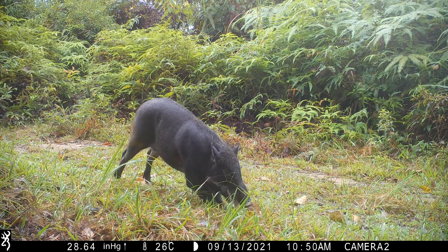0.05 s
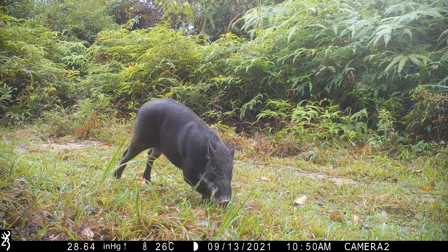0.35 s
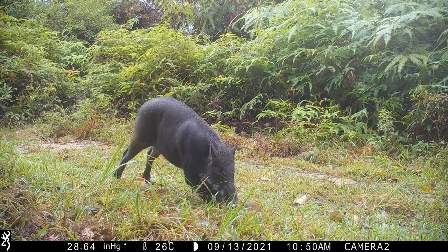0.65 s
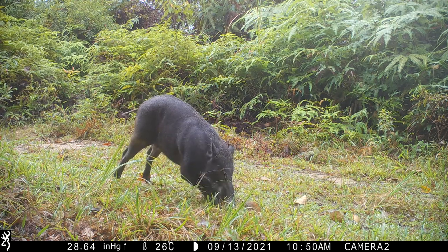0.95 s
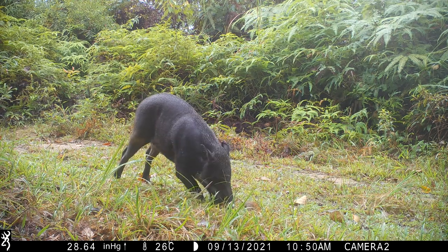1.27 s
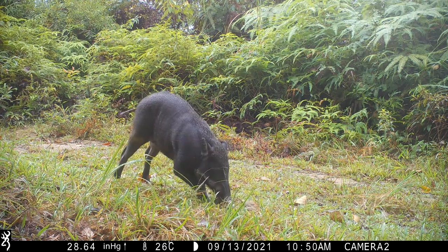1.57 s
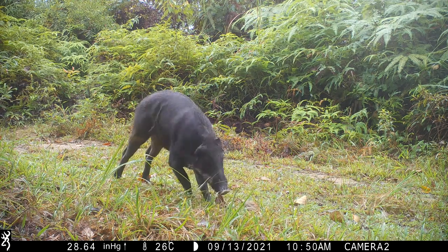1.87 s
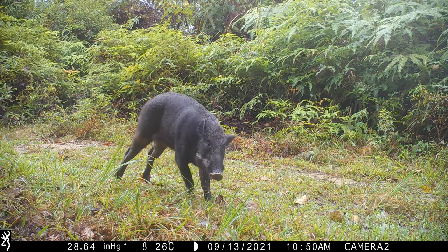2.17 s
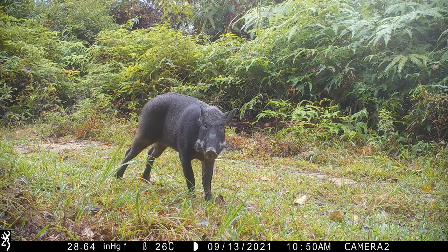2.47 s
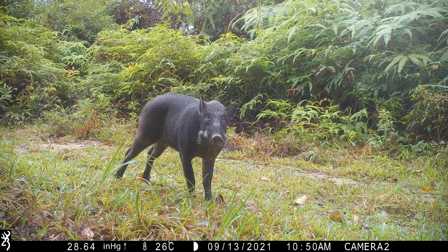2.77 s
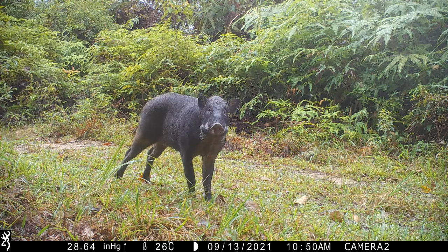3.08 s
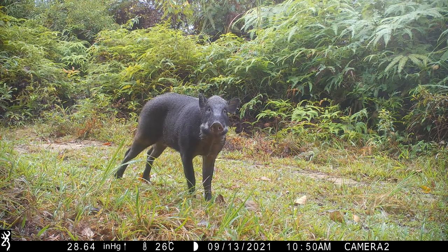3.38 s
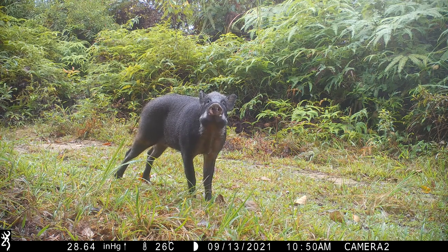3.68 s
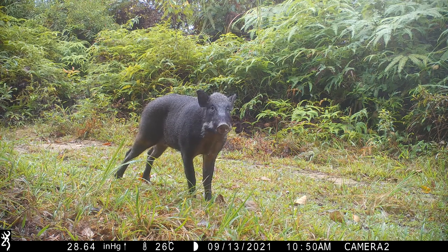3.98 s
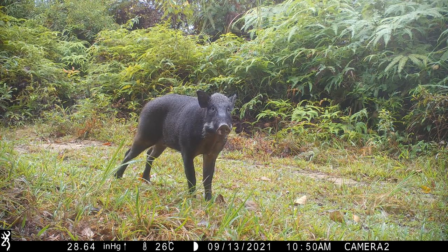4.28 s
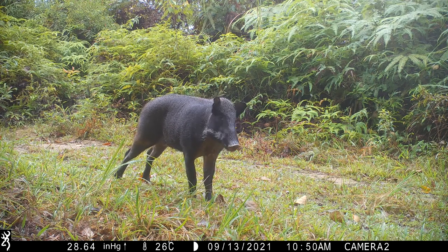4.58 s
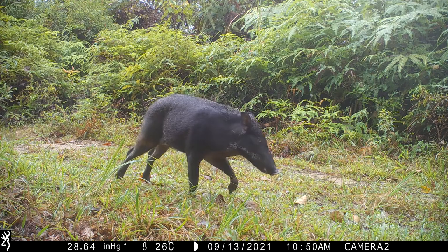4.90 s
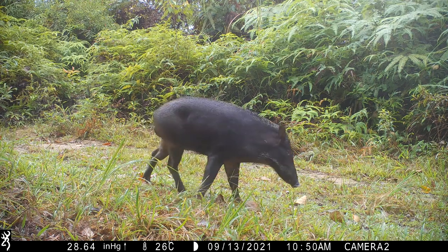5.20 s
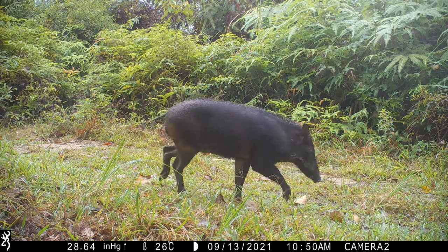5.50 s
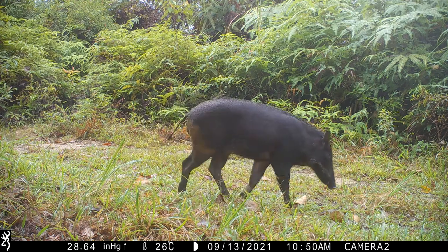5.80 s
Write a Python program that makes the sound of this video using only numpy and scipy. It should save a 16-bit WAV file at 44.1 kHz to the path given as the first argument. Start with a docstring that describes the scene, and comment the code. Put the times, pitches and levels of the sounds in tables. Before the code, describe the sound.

A wild boar roots through grass at a forest edge, with soft rustles and crisp snaps of stems. About two seconds in comes a quick run of loud, wet jaw smacks. A few more smacks and snaps follow, then a pause, then faint hoof steps brushing the grass. Small birds chirp and whistle throughout over a steady hush, with very faint insects and a thin electronic whine at the microphone.

```python
"""A wild boar roots in grass at a forest edge, smacks its jaws, chews, stands still and walks off.
Each wet smack rings its mouth, while its snout and hooves brush the grass and snap stems.
Small birds call from the thicket, whose echo smears their notes, over a steady forest hush
with faint insects. A trail camera's electronics add a thin whine."""
import sys
import numpy as np
from scipy import signal
from scipy.fft import rfft, irfft, next_fast_len
from scipy.io import wavfile
from scipy.ndimage import map_coordinates

SR = 44100
rng = np.random.default_rng(int(sys.argv[2]) if len(sys.argv) > 2 else 0)


def unload_wav(signal):
    """Save mono or channel-first audio to the path in sys.argv[1] as 16-bit WAV at rate SR, clipped to [-1, 1]."""
    wavfile.write(
        sys.argv[1],
        SR,
        np.round(np.clip(np.atleast_2d(signal).T, -1, 1) * 32767).astype(np.int16),
    )


N = 257984  # samples, about 5.85 seconds

# the boar's wet jaw smacks: (time [s], level [dB], mouth pitch [Hz], swell time [s],
# second pop compared with the smack [dB])
JAW_SMACKS = [(1.033, -42.5, 883, 0.0033, -5), (1.352, -33, 1154, 0.0026, -17),
              (1.473, -39, 1404, .0024, -10), (1.717, -42, 1430, 0.0023, -14),
              (1.7902, -16.5, 1690, 0.00054, -20), (1.8401, -29.5, 1440, 0.00073, -11),
              (1.9011, -18.5, 1380, 0.00097, -5), (1.9592, -20, 1540, 0.00072, -10),
              (2.0164, -15, 1390, 0.0011, -10), (2.086, -27, 1244, 0.0018, -13),
              (2.138, -32.5, 1390, 0.00088, -24), (2.378, -40, 1180, 0.0023, -5),
              (3.0257, -40.5, 1390, 0.00087, -12), (3.127, -35, 1270, .0012, -7)]
def jaws():
    """Each smack comes with tiny saliva clicks and a smaller, higher pop as the lips part again."""
    out = np.zeros(N)
    for s, db, hz, swell, second_db in JAW_SMACKS:
        add(out, s, amp(db) * smack(hz, swell))
        add(out, s + .0091, amp(db + second_db) * smack(hz * 1.045, swell * .73))
        for when, pitch in rng.standard_normal((3, 2)):  # three saliva clicks
            click = smack(hz * np.exp(.28 * pitch), swell=.00048)
            add(out, s + .005 + .0048 * when, amp(db - 20) * click)
    return out


# the tone of a dull cheek thump: (frequency [Hz], level [dB])
CHEEK_TONE = [(30, -41), (120, -13), (280, -2), (480, -11), (1000, -16), (3000, -94)]
# the tone of a sharp crack, for spit here and for stems below: (frequency [Hz], level [dB])
CRACK_TONE = [(50, -15), (250, -4), (700, 0.5), (1600, 9.5), (3600, 2), (5000, -14), (8000, -43),
              (15000, -39)]
def smack(hz, swell):
    """The mouth rings briefly, its pitch falling as it opens, while spit crackles and cheeks thump."""
    t = clock(.1)
    age = t / swell
    pitch = hz * (1 + 1.35 * np.exp(-age / .53))
    loudness = age ** 2 * np.exp(2 * (1 - age))  # peaks at the swell time
    pop = loudness * sine(pitch)
    spit = amp(-12) * burst(t, CRACK_TONE, fade_s=.008)
    thump = amp(-37.5) * burst(t, CHEEK_TONE, fade_s=.14)
    return echo(pop + spit + thump, fade_s=.11, echo_db=-17, build_s=.003)


# the loudest stems breaking: (time [s], level [dB], pitch [Hz], splinter compared with the snap [dB])
STEM_SNAPS = [(.357, -39, 2000, -10), (0.3716, -34.5, 1940, 0.5), (.5435, -42, 2240, -11),
              (0.611, -46, 2260, -11), (.647, -38.5, 3030, -9), (.7878, -36, 2520, -9),
              (.913, -38.5, 1140, -15), (1.025, -36.5, 1150, -20), (1.1736, -39, 2950, -13),
              (1.301, -33.5, 1720, -12), (1.601, -38.5, 2830, -3), (1.852, -35.5, 2780, -2.5),
              (2.7617, -35.5, 1400, -13), (2.951, -35, 2600, -11), (3.1025, -38, 3020, -18),
              (3.1279, -34.5, 2870, -14), (3.293, -39.5, 2340, -20), (3.689, -39, 2980, -17),
              (5.26, -40, 1580, -8), (5.595, -39, 1950, -16)]
def stems(small_per_s=14, small_hz=1820):
    """A few stout stems snap loudly; small ones break at random, louder when the boar pushes harder."""
    out, push = np.zeros(N), grass_push()
    for s, db, hz, splinter_db in STEM_SNAPS:
        add(out, s, amp(db) * snap(hz, splinter_db))
    for when, size, pitch in rng.random((int(small_per_s * N / SR), 3)):
        at = int(when * N)
        loudness = push[at] * amp(14) * (.5 + size)
        add(out, at / SR, loudness * snap(small_hz * 2 ** (pitch - .5), splinter_db=-4))
    return out


def snap(hz, splinter_db):
    """A stem gives way with a crack, a bright splinter and a brief hollow ring."""
    t = clock(.05)
    onset = 1 - np.exp(-t / .0003)
    ring = np.sin(2 * np.pi * hz * t) * fade(t, .008) * onset
    crack = amp(-7) * burst(t, CRACK_TONE, fade_s=.014)
    splinter = amp(splinter_db) * burst(t, GRASS_TONE, fade_s=.004)
    return echo(ring + crack + splinter, fade_s=.041, echo_db=-3, build_s=.0013)


# the tone of rustling blades and splintering stems: (frequency [Hz], level [dB])
GRASS_TONE = [(150, -27.5), (600, -6.5), (1500, 3), (3000, 0.5), (4200, -9.5), (6000, -17.5), (9000, -32.5),
              (15000, -34)]
def grass(ticks_per_s=3000):
    """Blades tick and scrape under each stroke, blending into an uneven rustle."""
    strength = amp(3.8 * np.minimum(rng.exponential(size=N), 4))
    ticks = (rng.random(N) < ticks_per_s / SR) * rng.standard_normal(N) * strength
    return grass_push() * unit(coloured(ticks, GRASS_TONE)) * amp(2.4 * wobble(60))


# snout and hoof strokes through the grass: (middle time [s], half length [s], level [dB])
GRASS_STROKES = [(0.034, 0.028, -56.5), (0.252, 0.031, -52), (0.34, 0.042, -56.5), (0.607, 0.081, -55),
                 (0.924, 0.06, -54.5), (1.073, 0.024, -55), (1.272, 0.054, -53), (1.517, 0.057, -58.5),
                 (1.618, 0.037, -51.5), (1.915, 0.17, -57), (2.795, 0.034, -58), (4.85, 0.016, -59.5),
                 (4.97, 0.036, -58.5), (5.28, 0.1, -63), (5.65, 0.064, -62.5)]
def grass_push():
    """How hard the boar pushes the grass: every stroke swells and fades."""
    t = np.arange(N) / SR
    power = sum(amp(db) ** 2 * np.exp(-((t - s) / half) ** 2) for s, half, db in GRASS_STROKES)
    return np.sqrt(power)


# one bird's repeated rising call: (time [s], opening pitch [Hz], level [dB])
RISING_CALLS = [(0.286, 3154, -59.5), (0.597, 3160, -59.5), (.84, 3080, -62.5), (1.089, 3130, -62.5),
                (1.321, 2937, -61), (1.549, 3060, -64.5), (1.78, 3165, -59.5), (2.099, 3163, -59.5),
                (2.353, 3060, -61.5), (2.591, 3025, -63), (3.073, 3150, -60), (3.375, 3070, -59.5),
                (3.644, 3115, -63), (3.882, 3034, -61.5), (4.39, 3113, -62), (4.682, 3103, -60),
                (4.933, 3033, -62), (5.162, 2963, -62), (5.412, 2964, -61.5)]
def calling_bird(length_s=.105, opening_share=.36, flick_drop_db=5):
    """A clean note sags a little, then flicks up, softer and raspier, and lingers in the thicket."""
    out, t = np.zeros(N), clock(length_s)
    progress = t / t[-1]
    rise = np.clip((progress - opening_share) / (1 - opening_share), 0, 1)
    sag = 1 + .02 * np.exp(-progress / .12)
    rasp = .006 + .055 * np.sqrt(rise)
    for s, hz, db in RISING_CALLS:
        flick_hz = 856.6 + 72 * (db + 62)  # a louder call flicks higher
        loudness = amp(db - flick_drop_db * np.sqrt(rise))
        call = loudness * note(hz * sag + flick_hz * rise, rasp, edge=.08)
        add(out, s, echo(call, fade_s=.56, echo_db=1, build_s=.013))
    return out


# clear bird whistles: (time [s], length [s], start pitch [Hz], held pitch [Hz], level [dB])
BIRD_WHISTLES = [(.113, 0.076, 4600, 4290, -67.5), (.522, 0.097, 2750, 2275, -52.5),
                 (.865, .1, 4150, 4460, -64), (.965, 0.082, 4400, 4510, -61.5),
                 (1.653, 0.043, 4320, 4250, -66), (2.774, 0.12, 4330, 4710, -65),
                 (4.185, 0.051, 4250, 4150, -66.5), (5.676, .1, 3950, 4290, -62.5),
                 (5.735, 0.086, 4320, 4670, -59.5), (5.77, 0.061, 2420, 2330, -62.5)]
def whistling_birds(settle_s=.01337):
    """Each whistle slides onto a pitch and holds it."""
    out = np.zeros(N)
    for s, length, start, held, db in BIRD_WHISTLES:
        pitch = held + (start - held) * np.exp(-clock(length) / settle_s)
        add(out, s, amp(db) * thicket(note(pitch, rasp=.016, edge=.19)))
    return out


# raspy sliding notes: (time [s], length [s], start pitch [Hz], end pitch [Hz], level [dB])
BIRD_SLIDES = [(.499, .053, 3080, 2680, -57), (0.623, .13, 2600, 3424, -56),
               (1.048, 0.026, 4010, 4300, -58), (2.842, 0.018, 4770, 5180, -65),
               (2.849, 0.076, 2900, 4090, -56), (5.69, 0.15, 4900, 5500, -75)]
def sliding_birds():
    """Each note bends from one pitch to another, fast at first, then levelling off."""
    out = np.zeros(N)
    for s, length, start, end, db in BIRD_SLIDES:
        pitch = end + (start - end) * (1 - clock(length) / length) ** 1.8
        add(out, s, amp(db) * thicket(note(pitch, rasp=.0466, edge=.24)))
    return out


# a quick run of short chirps: (time [s], level [dB])
BIRD_CHIRPS = [(4.072, -70), (4.137, -63.5), (4.224, -62.5), (4.312, -62), (4.419, -65)]
def chirping_bird(length_s=.038, start_hz=3750, end_hz=5150):
    """Each chirp sweeps straight up. This bird sits nearer, so it has less echo."""
    out = np.zeros(N)
    pitch = start_hz + (end_hz - start_hz) * clock(length_s) / length_s
    for s, db in BIRD_CHIRPS:
        add(out, s, amp(db) * thicket(note(pitch, rasp=.075, edge=.21), echo_db=-2))
    return out


def note(pitch, rasp, edge):
    """A bird's tone, made raspy by fast pitch flutter; edge is the share that fades at each end."""
    progress = np.linspace(0, 1, len(pitch))
    ramp = np.clip(np.minimum(progress, 1 - progress) / edge, 0, 1)
    loudness = np.sin(np.pi / 2 * ramp) ** 2
    flutter = 1 + rasp * wobble(700, len(pitch))
    return np.sqrt(2) * loudness * sine(pitch * flutter)


def thicket(song, echo_db=.5):
    """A song lingers among the trees."""
    return echo(song, fade_s=.49, echo_db=echo_db, build_s=.0088)


def echo(sound, fade_s, echo_db, build_s):
    """Leaves and ground scatter a sound into a soft tail, different every time."""
    t = clock(.6)
    tail = rng.standard_normal(len(t)) * fade(t, fade_s) * (1 - np.exp(-t / build_s))
    path = amp(echo_db) * tail / np.linalg.norm(tail)
    path[0] = 1  # the direct sound arrives first
    return signal.fftconvolve(sound, path)


# the tone of the forest's hush: (frequency [Hz], level [dB])
HUSH_TONE = [(15, -46), (30, -15.5), (70, -10.5), (220, -2.5), (550, 1), (1250, 1), (2300, -1.5),
             (3200, -7), (3900, -12.5), (4600, -21), (6000, -28.5), (8500, -39), (11000, -39.5),
             (15500, -39)]
def forest(insect_hz=6620):
    """A steady hush, with the faint high buzz of far insects."""
    hush = amp(-56.5) * coloured(rng.standard_normal(N), HUSH_TONE)
    insects = unit(wobble(300) * np.sin(2 * np.pi * insect_hz * np.arange(N) / SR))
    return hush + amp(-90.5) * insects


# moments when the whine's pitch flickers upward: (middle time [s], half length [s])
WHINE_FLICKERS = [(2.523, .006), (4.004, 0.0083)]
def camera_whine(hz=7796.2, flips_per_s=59.5):
    """The camera's electronics sing one thin tone whose wave keeps flipping upside down."""
    t = np.arange(N) / SR
    flicker = sum(abs(t - s) < half for s, half in WHINE_FLICKERS)
    pitch = hz + flicker * (180 + 180 * wobble(400))
    flips = signal.square(np.pi * flips_per_s * t)
    return amp(-77) * unit(sine(pitch) * flips)


def amp(db):
    """Turn decibels into a multiplier."""
    return 10 ** (np.asarray(db) / 20)


def unit(x):
    """Scale a sound to an average strength (rms) of 1."""
    return x / np.sqrt(np.mean(x ** 2) + 1e-20)


def clock(seconds):
    """The time of each sample in a short sound."""
    return np.arange(int(seconds * SR)) / SR


def sine(pitch):
    """A pure tone that follows a changing pitch in Hz."""
    return np.sin(2 * np.pi * np.cumsum(pitch) / SR)


def fade(t, fade_s):
    """Die away by 60 dB in fade_s seconds."""
    return amp(-60 * t / fade_s)


def add(track, s, sound):
    """Mix a sound into the track at s seconds."""
    part = track[max(round(s * SR), 0):][:len(sound)]
    part += sound[:len(part)]


def wobble(rate, size=N):
    """A smooth curve through random values, rate of them a second."""
    values = rng.standard_normal(int(size * rate / SR) + 4)
    return map_coordinates(values, [np.arange(size) * rate / SR])


def burst(t, tone, fade_s):
    """A dying puff of noise, shaped by a tone table."""
    return coloured(rng.standard_normal(len(t)) * fade(t, fade_s), tone)


def coloured(x, tone):
    """Balance a sound's lows and highs by a tone table, keeping its overall strength."""
    hz, db = np.transpose(tone)
    size = 2 * next_fast_len(len(x))
    log_hz = np.log(np.fft.rfftfreq(size, 1 / SR) + 1)
    gain = amp(np.interp(log_hz, np.log(hz), db))
    cepstrum = irfft(np.log(gain))[:size // 2]  # keep half, so the filter never rings ahead of a sound
    cepstrum[1:] *= 2
    response = np.exp(rfft(cepstrum, size))
    shaped = irfft(rfft(x, size) * response, size)[:len(x)]
    return np.std(x) * unit(shaped)


def scene():
    """Boar, birds and forest at one microphone."""
    boar = jaws() + stems() + grass()
    birds = calling_bird() + whistling_birds() + sliding_birds() + chirping_bird()
    return (boar + birds + forest())[None]


def record(dry):
    """The camera adds its whine and cuts off the very highest treble."""
    kept = np.fft.rfftfreq(N, 1 / SR) < 15800  # Hz
    return irfft(rfft(dry + camera_whine()) * kept, N)


dry = scene()
out = record(dry)
unload_wav(out)
```